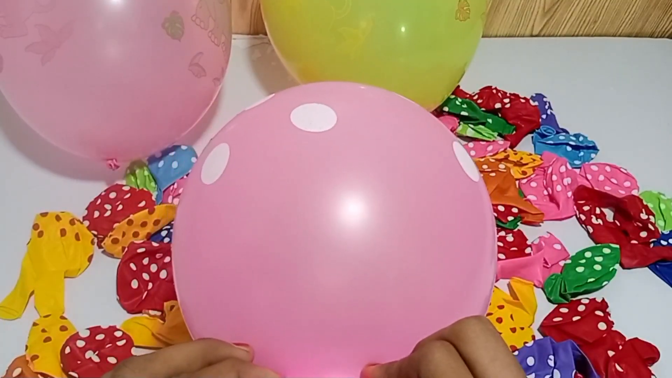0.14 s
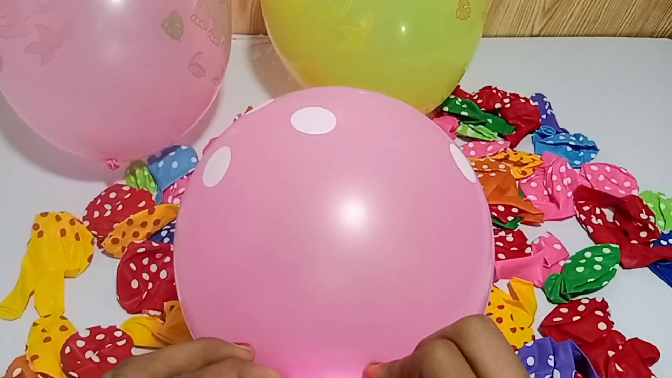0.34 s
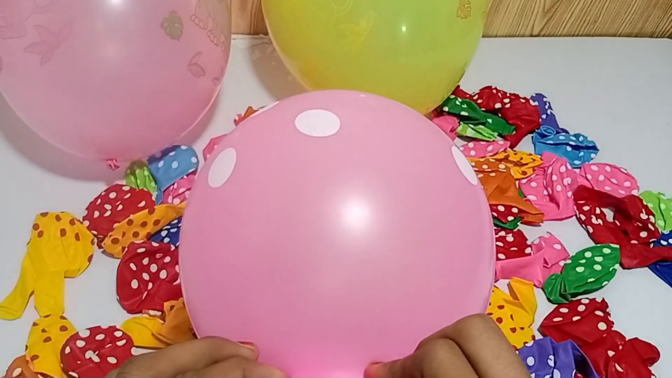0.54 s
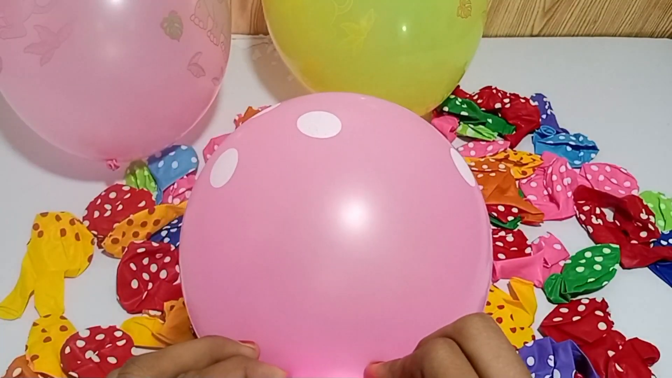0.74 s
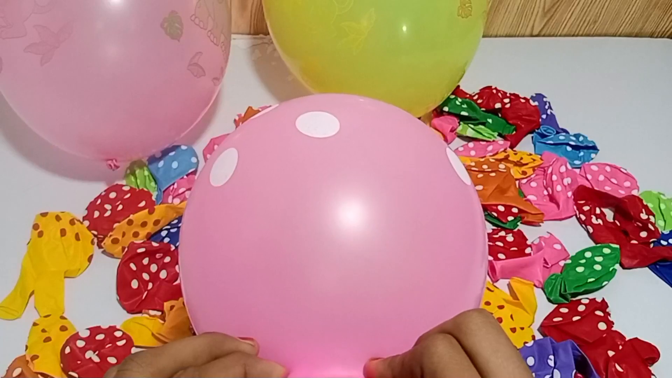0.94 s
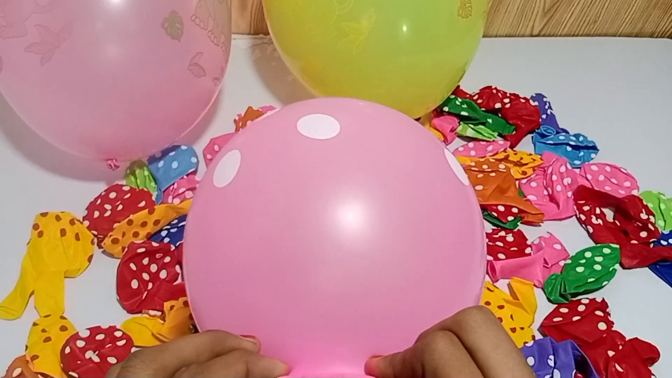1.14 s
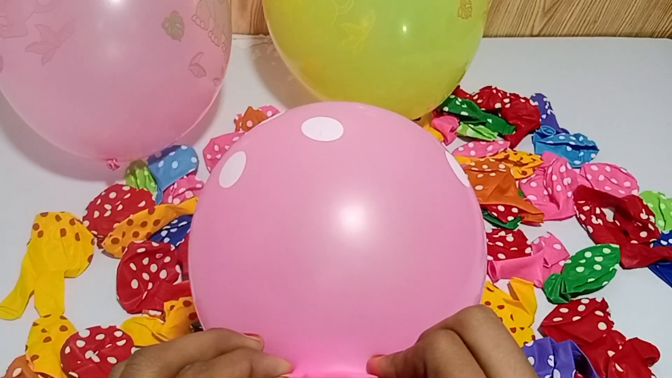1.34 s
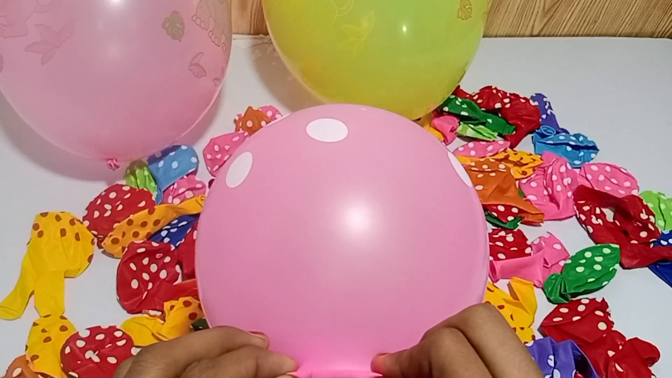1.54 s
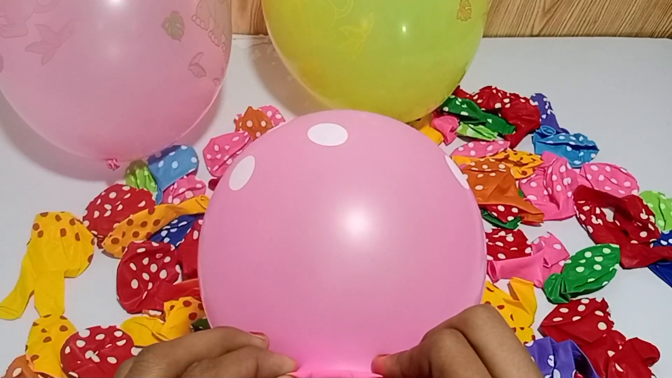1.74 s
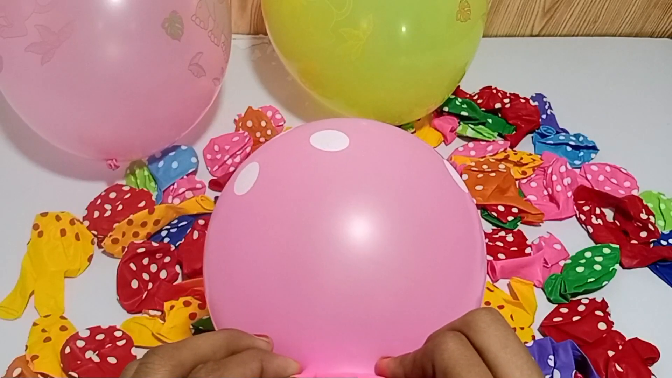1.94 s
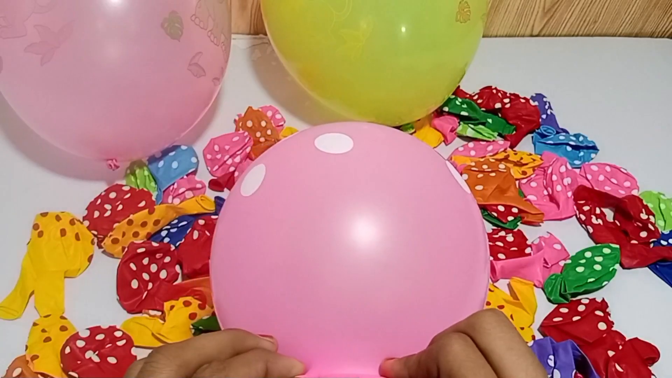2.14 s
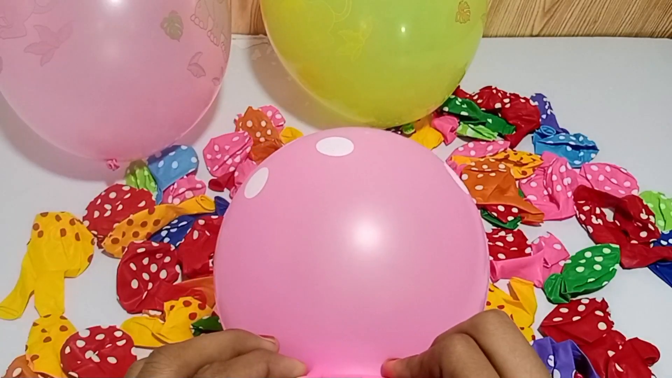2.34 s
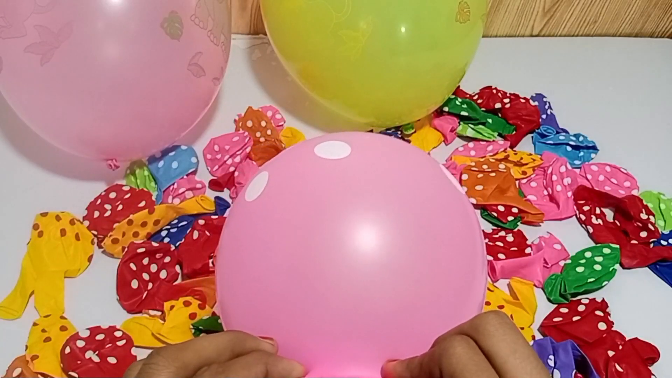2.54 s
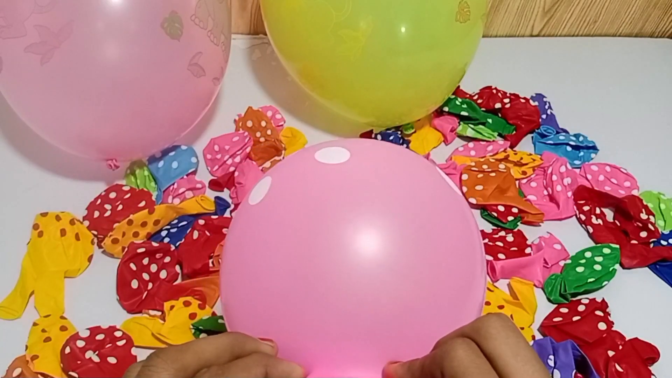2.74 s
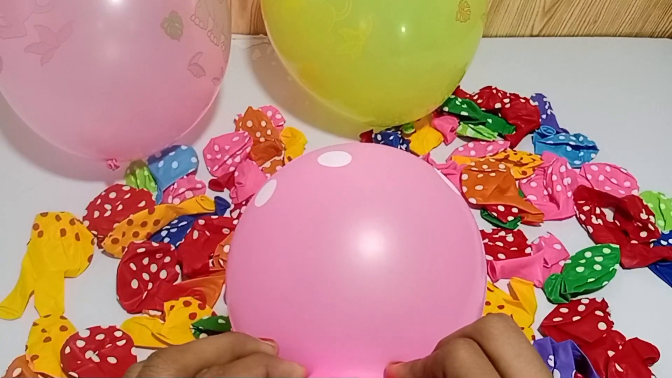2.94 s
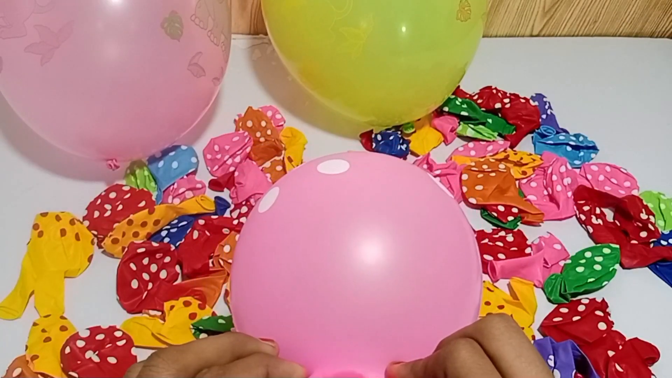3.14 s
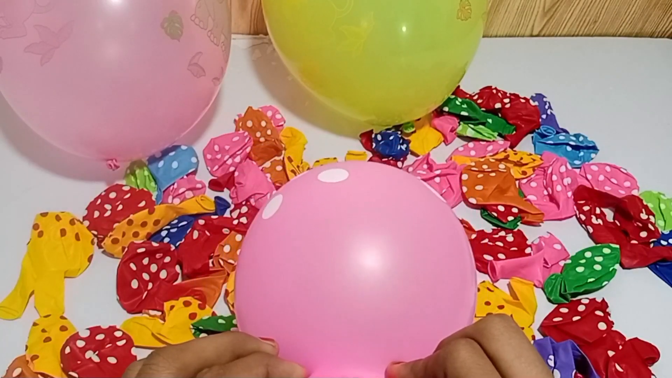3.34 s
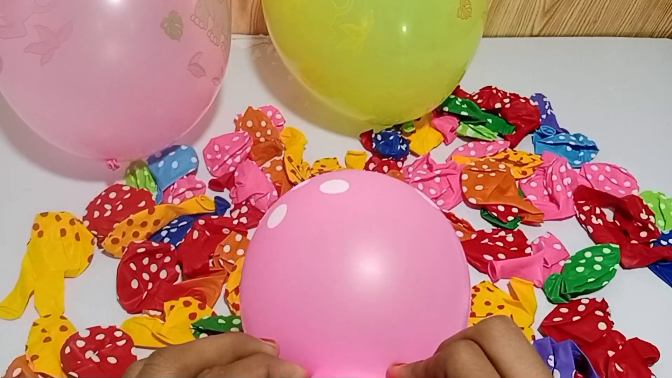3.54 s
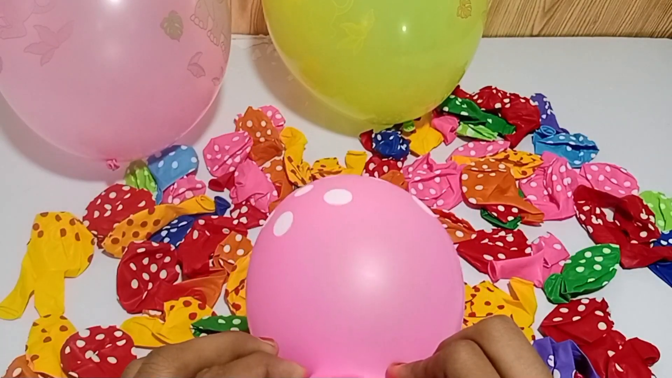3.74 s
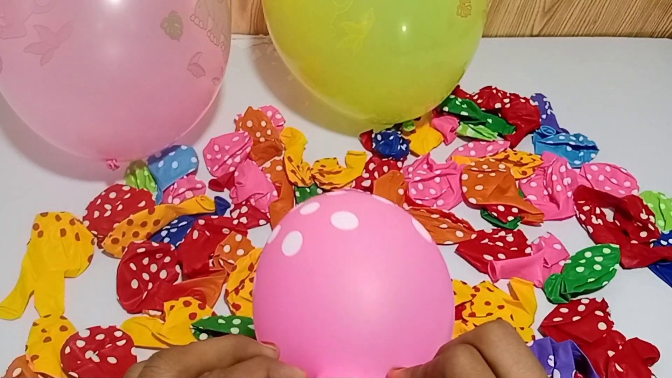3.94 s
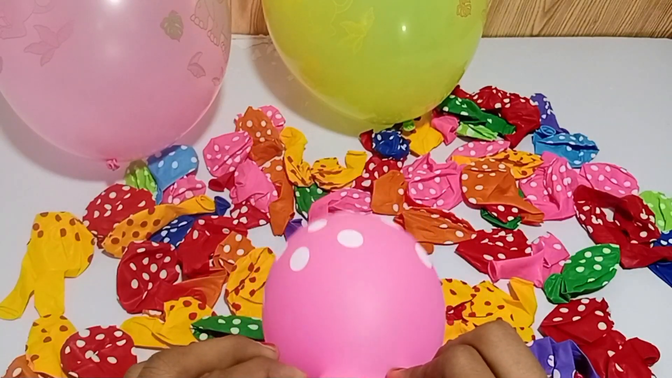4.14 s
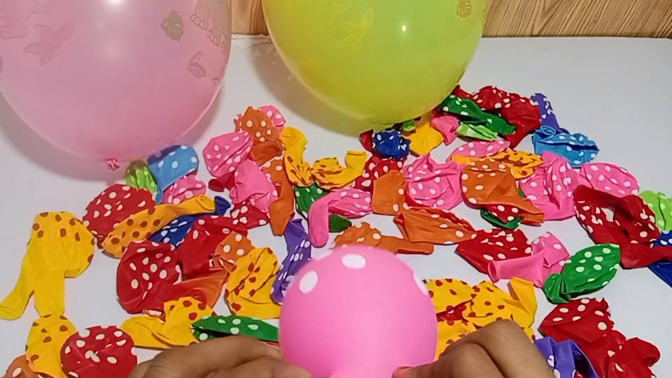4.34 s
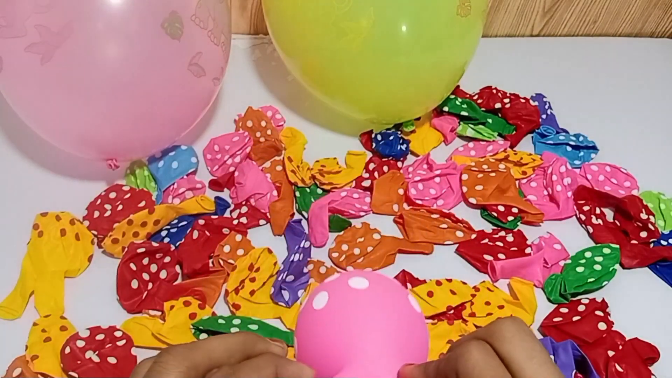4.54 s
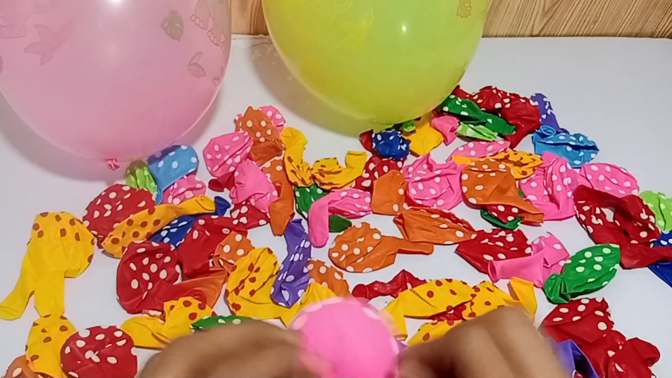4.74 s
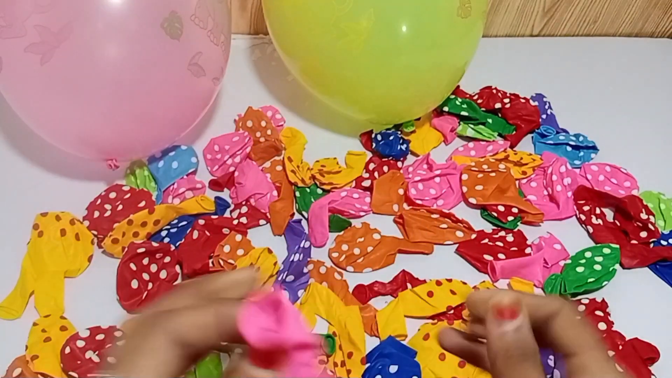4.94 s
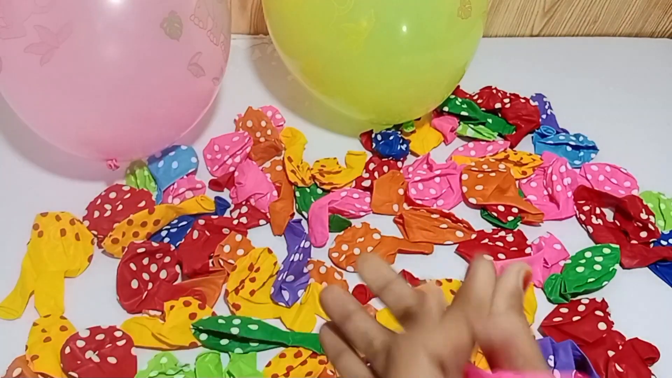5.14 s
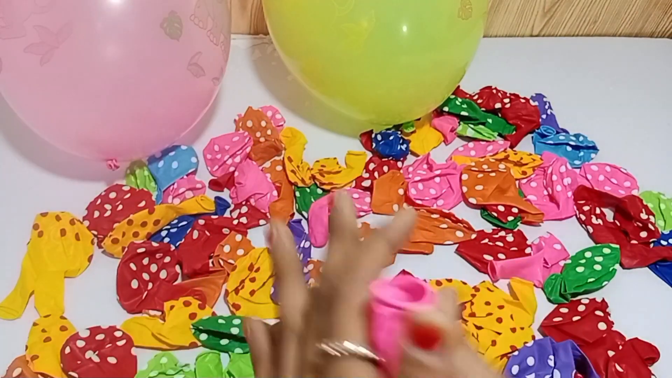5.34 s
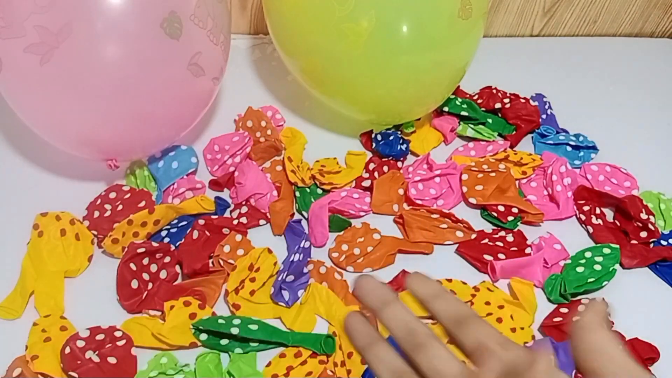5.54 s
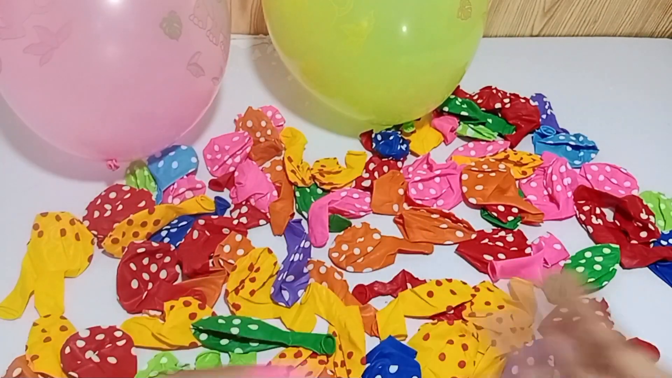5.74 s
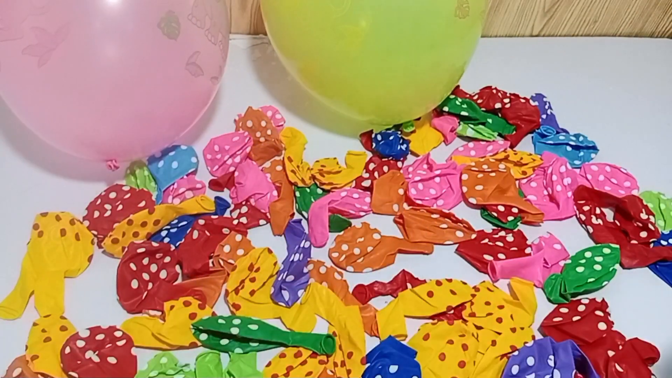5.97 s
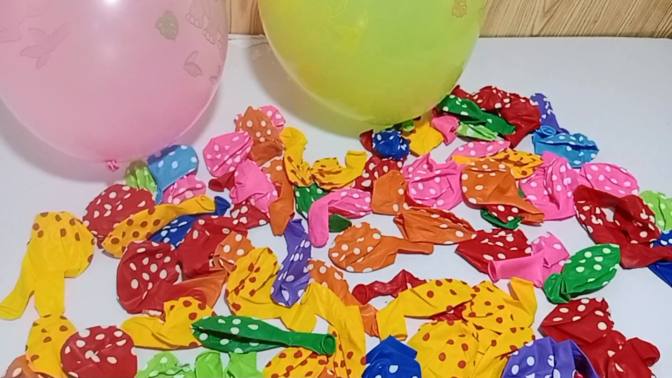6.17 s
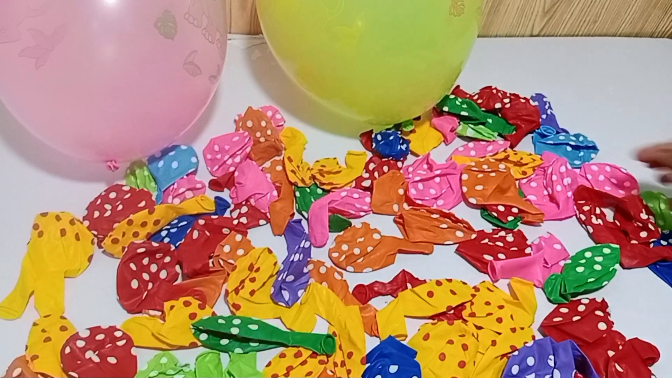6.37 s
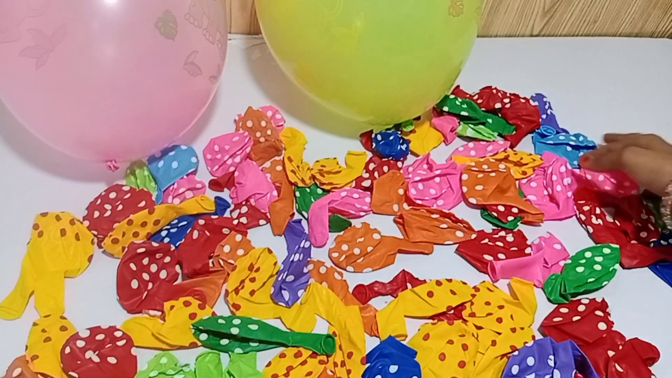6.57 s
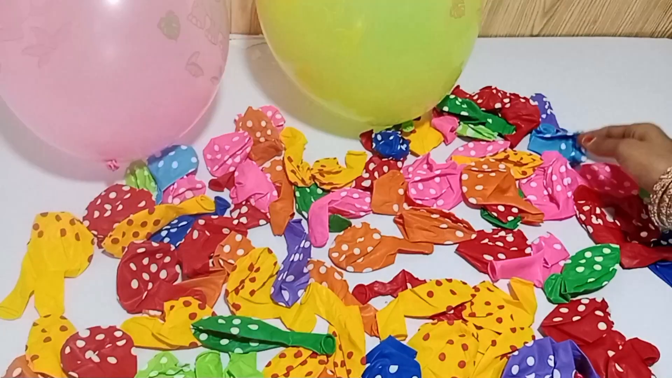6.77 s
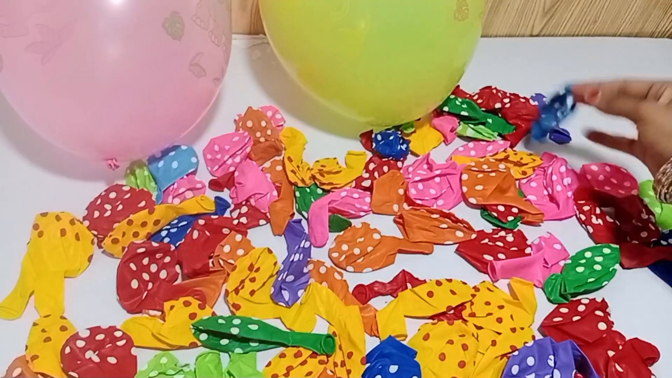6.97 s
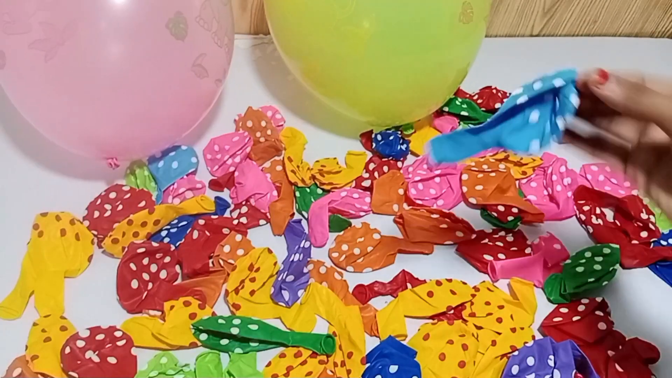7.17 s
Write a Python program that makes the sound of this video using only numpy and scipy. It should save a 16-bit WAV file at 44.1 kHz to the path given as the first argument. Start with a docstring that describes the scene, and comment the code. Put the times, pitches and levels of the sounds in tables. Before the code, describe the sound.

Close up in a reverberant hard-walled room, air escapes through a balloon's pinched neck as a long, rough, buzzing squeal, wavering but steady in pitch for over four seconds. Near the end it gushes and climbs to a piercing shriek over a sagging whistle, then cuts off with a puff. Soft table thuds, rubber snaps and a few bright bangle jingles follow over faint hiss.

```python
"""Balloon squealing empty

A balloon empties through its stretched neck, heard close up in a hard-walled room.
The rubber lips flap roughly and chop the air into a rasping squeal that rings the neck.
As the balloon runs out, tight vibrations of the shrinking neck rise to a shriek over a sagging whistle.
Filtered noise makes the rushing air, table bumps, rubber snaps and a faint steady hiss that is switched
between two levels; fading sine waves make jingling bangles."""
import sys
import numpy as np
from scipy import signal
from scipy.fft import irfft, next_fast_len
from scipy.io import wavfile
from scipy.ndimage import uniform_filter1d

SR = 44100
rng = np.random.default_rng(int(sys.argv[2]) if len(sys.argv) > 2 else 0)


def transcribe(u):
    """Save the signal u as a 16-bit wav file named by the first command-line argument.

    u: samples, shape (n,) or (channels, n), limited to [-1, 1]; the rate is SR.
    q: integer samples, one column per channel.
    """
    v = np.clip(np.atleast_2d(u).T, -1, 1)
    q = np.round(v * 32767).astype(np.int16)
    wavfile.write(sys.argv[1], SR, q)


N = 317916
TIME = np.arange(N) / SR

# middle pitch of the flapping lips: (time [s], pitch [Hz])
LIP_PITCH = [(0, 538.2), (.45, 528), (.9, 533.9), (2.0, 532.4), (2.8, 525.8), (3.2, 518), (3.6, 521),
             (4.1, 524.6)]
# colour of the slapping lips: (frequency [Hz], relative level [dB per Hz])
RASP_COLOUR = [(60, -29), (230, -18.5), (390, -13.5), (580, -5), (700, -16.5), (800, -4), (1000, -2.3),
               (1270, 1), (1800, -.5), (2400, -.5), (2800, -6), (3400, -1.5), (4500, -6.5), (7500, -25.5)]
# colour of the air between the lips: (frequency [Hz], relative level [dB per Hz])
HISS_COLOUR = [(100, -49), (2000, -49), (5000, -15.5), (6200, -3.5), (7150, -11.5), (7800, -1.5),
               (8500, -6), (9200, 0.5), (10100, 3), (11000, -7), (12200, -18), (13200, -20.5),
               (14200, -14.5), (15300, -9)]
# surges of the lips' own tone, building up and collapsing: (start [s], collapse [s], top level [dB])
TONE_SURGES = [(-.1, .02, -36), (.04, .13, -36.5), (.15, .39, -32.5), (.25, .53, -37), (.42, .705, -32.5),
               (.68, 1.09, -41), (1.12, 1.46, -41), (1.6, 1.98, -44.5), (2.12, 2.285, -40),
               (2.32, 2.58, -41.5), (2.87, 3.03, -33), (3.05, 3.14, -40.5), (3.21, 3.31, -41),
               (3.36, 3.58, -43.5), (3.85, 4.46, -38.5)]
# surges of its octave, which carries the squeal: (start [s], collapse [s], top level [dB])
OCTAVE_SURGES = [(-.5, .13, -25.5), (.36, .48, -35), (.6, .73, -37), (.92, 1.03, -31.5), (1.12, 1.35, -36),
                 (1.8, 1.97, -33.5), (2.3, 2.85, -35.5), (2.95, 3.2, -32.5), (3.36, 3.65, -36),
                 (4.08, 4.3, -33.5)]
# resonances of the stretched neck: (frequency [Hz], width [Hz], level against the rasp [dB])
NECK_RESONANCES = [(577.4, 20, -27), (995, 42, -12.5), (1245, 28, -17), (1552, 41, -13), (1610, 30, -11),
                   (2108, 70, -5), (2390, 50, -17), (2660, 48, -23), (3026, 180, -9), (3290, 170, -11.5),
                   (4195, 110, -13.5), (5860, 84, -14.5), (6270, 100, -10), (6880, 68, -18)]
# as the rubber slackens, some resonances give way to others: (frequency [Hz], change [dB])
SLACK_CHANGE = [(1250, 1.5), (1580, 4.5), (2100, -11), (2640, 4), (3100, -1), (4100, 1.5)]
# brief tones: neck whistles, the octave slipping flat near 1000 Hz and one beat tone near 584 Hz:
# (time [s], frequency [Hz], level before throbbing [dB])
BRIEF_TONES = [(.06, 2110, -31.5), (.14, 1612, -32), (.42, 3047, -37), (.45, 985, -34), (.49, 2110, -39),
               (.701, 3040, -37), (.82, 2118, -37), (1.01, 995, -35), (1.05, 3241, -39), (1.061, 1612, -36),
               (1.27, 1000, -33), (1.361, 3335, -38), (1.39, 4180, -36), (1.44, 2110, -32.5),
               (1.46, 3060, -39.5), (1.47, 985, -35), (1.589, 4170, -38), (2.29, 1000, -35),
               (2.54, 1000, -32), (2.73, 2110, -35.5), (2.84, 1238, -39), (2.96, 3036, -38),
               (3.1, 1008, -30.5), (3.16, 6234, -37), (3.19, 1005, -29.5), (3.34, 2390, -39.5),
               (3.46, 2390, -39.5), (3.59, 1008, -33), (3.84, 2659, -37.5), (4.02, 6245, -35.5),
               (4.04, 583.5, -37.5), (4.16, 4170, -33), (4.26, 5954, -34), (4.35, 1561, -31),
               (4.35, 3122, -28), (4.41, 6810, -38), (4.45, 1566, -31)]
# gushes of air: (start [s], loudest [s], level [dB], fade [s])
GUSHES = [(4.1, 4.56, -36.5, .27), (4.769, 4.832, -36.5, .025), (5.129, 5.147, -51.5, .025)]
# hollow rush of air through the slack neck: (frequency [Hz], relative level [dB per Hz])
HOLLOW_COLOUR = [(100, -40), (250, -26), (500, -6.5), (740, -20), (1100, -1), (1750, -1), (2600, -19.5),
                 (6000, -34), (15000, -45)]
# tight vibrations of the shrinking neck: (first pitch [Hz], last pitch [Hz], bend of the glide [power],
# strand spacing [Hz], swell start [s], collapse start [s], collapse length [s], top level [dB],
# ease of the growth [power])
SHRIEK_VOICES = [(3040, 3520, 3.1, 100, 4.065, 4.58, .15, -26.6, 3.3),
                 (4180, 5080, 1.6, 135, 4.02, 4.615, 0.11, -28.5, 1.6),
                 (6080, 6750, 5.5, 170, 4.26, 4.57, .07, -25.7, 1.7)]
# hands and balloon bump the table: (time [s], peak level [dB], pitch [Hz], width [Hz], length [s])
BUMPS = [(3.164, -47.5, 148.9, 130, 0.011), (3.296, -37, 404, 100, 0.013), (3.772, -46, 157.9, 130, 0.0095),
         (4.12, -40, 220, 200, 0.035), (4.182, -34.5, 210, 198, 0.019), (4.248, -40, 210, 200, 0.0093),
         (4.445, -39.5, 190, 160.3, 0.022), (4.544, -37, 200, 200, 0.0081), (4.658, -44.5, 342, 70, 0.022),
         (4.842, -39, 205, 220, 0.016), (5.143, -36, 200, 230, 0.011), (6.003, -52.5, 152, 34, 0.02)]
# bangles knock together; glancing knocks ring mostly the top modes: (time [s], level [dB], brightness [dB])
JINGLES = [(4.94, -62, 12), (4.971, -56, 12), (5.147, -47, 3), (5.171, -42, 3), (5.185, -48, -9),
           (5.228, -40.5, 4), (5.497, -47, -7), (5.513, -46.5, -4), (5.526, -45, 4), (6.245, -55, 5),
           (6.252, -45.5, 2), (6.269, -42, 0), (6.296, -49, 2), (6.339, -48, -5), (6.431, -47.5, 2),
           (6.457, -55, 0), (6.544, -54.5, -1), (6.569, -58, 0), (6.626, -51.5, 7)]
# ring of the bangles: (frequency [Hz], relative level [dB], time to fade by 60 dB [s])
BANGLE_MODES = [(450, -26, .3), (1450, -22, 0.3), (4020, -20, 0.18), (4425, -9.5, 0.16), (7730, 0.5, 0.18),
                (7840, -1, 0.2), (8260, 2.5, 0.22), (8450, -0.5, 0.22), (12310, 0.5, 0.16),
                (12450, -2, .16), (12670, -1, .2), (13300, -1, .18), (13420, 0, 0.16), (13590, -1, .18)]
# the limp rubber snaps: (time [s], level before colouring [dB])
SNAPS = [(5.387, -49), (5.399, -38.5), (5.927, -49), (5.951, -46)]
# hands slide over rubber: (start [s], end of growth [s], level [dB])
STROKES = [(4.75, 4.85, -45), (5.083, 5.15, -54), (5.194, 5.3, -66), (5.349, 5.678, -63.5)]
# colour of the handled rubber: (frequency [Hz], relative level [dB per Hz])
RUBBER_COLOUR = [(200, -17), (1500, -9), (3000, -6), (10000, 4.5), (15500, -8)]
# spans in which the steady hiss is switched up: (start [s], end [s])
STEADY_HISS_SPANS = [(0, 5.1), (5.768, 5.97), (6.215, 6.248), (6.826, 7.3)]
# colour of the steady hiss: (frequency [Hz], relative level [dB per Hz])
STEADY_HISS_COLOUR = [(40, -15.5), (100, -9), (300, -10.5), (500, -5.5), (900, -12), (6000, -19),
                      (8500, -27), (10000, -15), (15500, -28.5)]
# how long the room rings: (frequency [Hz], time to fade by 60 dB [s])
ROOM_FADE = [(200, 0.5), (1300, 1.14), (4000, 0.91), (15000, .5)]
# how loud the room answers: (frequency [Hz], level against the direct sound [dB])
ROOM_LEVEL = [(500, -9.5), (1200, -5.5), (4000, -7), (15000, -8)]

# the lips stop flapping, then the balloon is empty (s)
STALL_S, EMPTY_S = 4.5, 4.83
FLUTTER_HZ = 78.44  # middle pitch of the neck's slower flutter


def lips(drift=.0075, jitter=.02, sway=.012, flutter_spread_hz=6):
    """Cycles done by the lips, and the phase of the slower flutter of the neck that sways them."""
    flap = waver(FLUTTER_HZ, flutter_spread_hz, 12)
    pitch_change = drift * wander(14) + jitter * wander(200) + sway * np.cos(flap)
    hz = curves(LIP_PITCH)[0] * (1 + pitch_change)
    return np.cumsum(hz) / SR, flap


def squeal(turns, flap, stall_length=.06, throb_db=2.0):
    """The lips' own tone, its octave throbbing with the flutter, and lower tones that beat against it."""
    phase = 2 * np.pi * turns
    low_db = surging(TONE_SURGES, rest_db=-50.5, ease=1.9, collapse=.025)
    octave_db = surging(OCTAVE_SURGES, rest_db=-41.5, ease=2.4, collapse=.051)
    low = amp(low_db) * unit(np.cos(phase) * amp(1.7 * wander(14)))

    # the octave throbs less when it sings strongly: from -32.5 dB, over 6 dB, it loses 55 % of the throb
    loose = 1 - .55 * np.clip((octave_db + 32.5) / 6, 0, 1)
    throb = amp(loose * (throb_db * np.cos(flap) + 1.6 * wander(30)))
    tremble = waver(0, 11 * loose, 22) + .42 * loose * wander(45)
    octave_wave = np.cos(2 * phase + tremble) + .22 * loose * np.cos(2 * phase - flap)
    octave = amp(octave_db) * unit(octave_wave * throb)

    # at full pressure the flutter splits lower tones off the fundamental
    beats = np.cos(phase - flap) + amp(-16) * np.cos(phase - 2 * flap)
    beat_db = low_db - 7 - 10 * ramp(.59, .08)
    beat = amp(beat_db) * unit(beats)
    return (low + octave + beat) * (1 - ramp(STALL_S, stall_length))


def jet(turns, flutter, uneven_db=3.5, stray_per_s=650, puff_turns=.23):
    """Each closing of the lips is a slap of chance size with a puff of air; stray slaps fall in between."""
    closing = np.diff(np.floor(turns + .09 * wander(400)), prepend=0) > 0
    stray = rng.random(N) < stray_per_s / SR
    slap_db = uneven_db * 2 * np.tanh(rng.standard_normal(N) / 2)
    slaps = (closing + .82 * stray) * amp(slap_db)
    puffs = (.18 + np.exp(-(turns % 1) / puff_turns)) * rng.standard_normal(N)
    throb = amp(1.7 * flutter + 1.5 * wander(76))
    drive = unit(unit(slaps - slaps.mean()) + .66 * unit(puffs)) * throb
    rasp_flow = flow(first_db=-41.5, db_per_s=.8, stall_db=7.5, stall_length=.26)
    hiss_flow = flow(first_db=-38, db_per_s=1.62, stall_db=7, stall_length=.36)
    rasp = rasp_flow * (unit(colour(drive, RASP_COLOUR)) + neck(drive))
    return rasp + hiss_flow * unit(colour(drive, HISS_COLOUR))


def flow(first_db, db_per_s, stall_db, stall_length, puff_s=.0042, puff_db=6.5, die_db_per_s=351):
    """Strength of the jet: it climbs as the neck relaxes, drops at the stall, puffs once more and dies."""
    climb = first_db + db_per_s * np.minimum(TIME, STALL_S) - stall_db * ramp(STALL_S, stall_length)
    last_puff = puff_db * np.exp(-((TIME - EMPTY_S + puff_s) / puff_s) ** 2)
    return amp(climb + last_puff - die_db_per_s * np.maximum(TIME - EMPTY_S, 0))


def neck(drive, slip=.006, swell_db=3.0, settle_db=2, limp_db=10):
    """Resonances that shift together with the grip of the fingers and swell one by one."""
    stretch = 1 + slip * wander(6.9)
    # the taut neck of the full balloon rings most, the limp one hardly at all
    settling = settle_db * np.interp(TIME, [0, 4], [1, -1])
    taut = amp(settling - limp_db * ramp(STALL_S, EMPTY_S - STALL_S))
    slack = ramp(2.7, .63)
    ringing = 0
    for hz, width, db in NECK_RESONANCES:
        level = amp(db + slack * read(SLACK_CHANGE, hz) + swell_db * wander(8) - 1)
        ringing = ringing + level * ring(drive, hz * stretch, width)
    return taut * ringing


def brief_tones(flutter, length=.031):
    """Brief throbbing tones: neck whistles, the octave slipping flat near 1000 Hz, one beat near 584 Hz."""
    out, shake = np.zeros(N), waver(0, 20, 70)
    for s, hz, db in BRIEF_TONES:
        near = abs(TIME - s) < 3 * length
        t = TIME[near] - s
        swell = amp(db) * np.exp(-.5 * (t / length) ** 2)
        out[near] += swell * np.cos(2 * np.pi * hz * t + shake[near])
    return out * amp(2.3 * flutter)


def gushes(ease=1.4, range_db=14):
    """Air rushes through the slackening neck, leaves in a last huff, and a hand squeezes the limp rubber."""
    level = sum(burst(start, end, db, ease, fade, range_db) for start, end, db, fade in GUSHES)
    return level * unit(colour(rng.standard_normal(N), HOLLOW_COLOUR))


def shriek(begin=4.0, fade=.036, stutter_depth=.6, stutter_hz=64):
    """Three fast vibrations glide up as the balloon shrinks and a low whistle sags, all throbbing together."""
    shrunk, tone = ramp(begin, EMPTY_S - begin - fade), 0
    for first_hz, last_hz, bend, spacing_hz, start, end, collapse, top_db, ease in SHRIEK_VOICES:
        hz = first_hz + (last_hz - first_hz) * shrunk ** bend
        level_db = surging([(start, end, top_db)], -46.5, ease, collapse)
        tone = tone + amp(level_db) * strands(hz, spacing_hz)
    sounding = ramp(begin - fade, fade) - ramp(EMPTY_S - fade, fade)

    # the lower whistle sags by 250 Hz per second as the neck slackens
    loudest = 4.585
    whistle_hz = 1320 - 250 * (TIME - loudest)
    whistle_gain = burst(4.52, loudest, db=-29, ease=1, release=.29, range_db=22)
    whistle = whistle_gain * strands(whistle_hz, 55)
    stutter = unit(1 - stutter_depth * np.cos(waver(stutter_hz, 12, 20) / 2) ** 6)
    return stutter * (tone * sounding + whistle)


def strands(hz, spacing_hz, tremble_hz=64, side_db=-4, uneven_db=1.8):
    """Three neighbouring strips of rubber vibrate at slightly different pitches."""
    total = 0
    for k in (-1, 0, 1):
        level = amp(abs(k) * side_db + uneven_db * wander(35))
        total = total + level * np.cos(waver(hz + k * spacing_hz, tremble_hz, 70))
    return unit(total)


def bumps():
    """Soft blows on the table top: short dull thuds made of noise in a narrow band."""
    out, t = np.zeros(N), np.arange(SR // 4) / SR
    for s, db, hz, width, length in BUMPS:
        edges = [max(hz - width / 2, 20), hz + width / 2]
        band = signal.butter(2, edges, "bandpass", fs=SR, output="sos")
        thud = signal.sosfilt(band, rng.standard_normal(len(t)) * t * np.exp(-2 * t / length))
        add(out, s, amp(db) * thud / abs(thud).max())
    return out


def bangles(rebound=.43, chatter_s=.022, mismatch=.005, scrape=.27, scrape_s=.025, count=5):
    """Every knock sets off a short scrape and smaller rebounds among hoops of nearly the same size."""
    out, t = np.zeros(N), np.arange(SR // 2) / SR
    hz, mode_db, t60 = np.transpose(BANGLE_MODES)[:, :, None]
    tilt = np.interp(hz, [4500, 8000, 12000], [-1, 0, 1])  # a bright knock favours the top modes
    for s, db, bright_db in JINGLES:
        delays = [0, *np.sort(rng.random(count - 1)) * chatter_s]
        for k, delay in enumerate(delays):
            strike, phase, detune = rng.standard_normal((3, len(BANGLE_MODES), 1))
            level = amp(mode_db + 3.8 * strike + bright_db * tilt - 60 * t / t60)
            hoop_hz = hz * (1 + mismatch * detune)
            hoops = (level * np.sin(2 * np.pi * (hoop_hz * t + phase))).sum(0)
            sharp_noise = np.diff(rng.standard_normal(len(t) + 2), 2)
            tick = sharp_noise * (.95 * np.exp(-t / .003) + scrape * np.exp(-t / scrape_s))
            add(out, s + delay, rebound ** k * amp(db - 13) * (hoops + tick))
    return out


def rubber(decay_s=.0015):
    """Snaps and rustle of the empty balloon in the hands: fading clicks and grainy noise."""
    snaps, t = np.zeros(N), np.arange(SR // 20) / SR
    for s, db in SNAPS:
        add(snaps, s, amp(db) * rng.standard_normal(len(t)) * np.exp(-t / decay_s))
    grain = rng.standard_normal(N) * amp(3.9 * wander(130))
    sliding = sum(burst(*row, ease=8.1, release=.23, range_db=28) for row in STROKES)
    return colour(snaps, RUBBER_COLOUR) + sliding * unit(colour(grain, RUBBER_COLOUR))


def room(x):
    """Hard walls return a diffuse tail of noise, each band dying at its own speed."""
    hz, t, z = signal.stft(rng.standard_normal(SR), SR, nperseg=256)
    t60 = read(ROOM_FADE, hz)[:, None]
    # a slowly dying band starts lower, so that its whole tail keeps the level in the table
    height = amp(read(ROOM_LEVEL, hz))[:, None] * np.sqrt(2 * np.log(1000) / (t60 * SR))
    fading = height * amp(-60 * t / t60) * (t > .004)
    tail = signal.istft(z * fading, SR, nperseg=256)[1]
    return signal.fftconvolve(x, tail)[:N]


def suppress(x, threshold_db=-59, depth_db=7, top_hz=6000, size=2000):
    """A gentle gate: below the treble, a sound that falls under the threshold is turned further down."""
    low = signal.sosfiltfilt(signal.butter(2, top_hz, fs=SR, output="sos"), x)
    level_db = 10 * np.log10(abs(uniform_filter1d(low ** 2, size)) + 1e-14)
    return x - low + low * amp(-np.clip(threshold_db - level_db, 0, depth_db))


def steady_hiss(low_db=-79, high_db=-66.5, rise_s=.0062, fall_s=.012):
    """Faint steady hiss, switched between a low and a higher level at set times."""
    switched_up = sum(ramp(start, rise_s) - ramp(end, fall_s) for start, end in STEADY_HISS_SPANS)
    level = amp(low_db + (high_db - low_db) * switched_up)
    return level * unit(colour(rng.standard_normal(N), STEADY_HISS_COLOUR))


def amp(db):
    """Turns decibels into a gain."""
    return 10 ** (np.asarray(db) / 20)


def unit(x):
    """Scales a sound to an rms (average strength) of one."""
    return x / np.sqrt(np.mean(x ** 2) + 1e-20)


def read(points, hz):
    """Reads a spectrum table on a log-frequency axis."""
    f, value = np.transpose(points)
    return np.interp(np.log(hz + 1), np.log(f + 1), value)


def curves(rows):
    """Each column of a time table at every sample."""
    s, *columns = np.transpose(rows)
    return [np.interp(TIME, s, c) for c in columns]


def add(mix, s, sound):
    """Mixes a sound in at s seconds."""
    part = mix[round(s * SR):][:len(sound)]
    part += sound[:len(part)]


def wander(width_hz):
    """Random motion of unit size; a greater width makes it quicker."""
    size = next_fast_len(N, True)
    hz = np.arange(0, 2500, SR / size)
    real, imag = rng.standard_normal((2, len(hz)))
    bell = np.exp(-.5 * (hz / width_hz) ** 2)
    return unit(irfft((real + 1j * imag) * bell, size)[:N])


def waver(hz, spread_hz, speed_hz):
    """Phase of a vibration whose pitch trembles at random."""
    return 2 * np.pi * np.cumsum(hz + spread_hz * wander(speed_hz)) / SR


def colour(x, points, size=2048):
    """Filters with the given spectrum, only ever after the event, so that clicks stay sharp."""
    log_gain = np.log(amp(read(points, abs(np.fft.fftfreq(size, 1 / SR)))))
    taps = np.fft.ifft(np.exp(np.conj(signal.hilbert(log_gain)))).real
    return signal.oaconvolve(x, taps)[:N]


def ring(x, hz, width):
    """A resonance with steep skirts that follows the curve hz."""
    turn, r = np.exp(2j * np.pi * np.cumsum(hz) / SR), np.exp(-np.pi * width / SR)
    # shift the resonance down to 0 Hz, smooth twice there and shift back
    smooth = signal.lfilter([1], [1, -2 * r, r * r], x / turn)
    return unit((turn * smooth).real)


def ramp(start, length):
    """Rises evenly from 0 to 1."""
    return np.clip((TIME - start) / length, 0, 1)


def surge(start, end, ease, collapse):
    """Grows from 0 to 1, levelling off the sooner the greater the ease, and collapses after the end."""
    growth = 1 - (1 - ramp(start, end - start)) ** ease
    return growth * (1 - ramp(end, collapse))


def surging(rows, rest_db, ease, collapse):
    """Level in dB of a vibration that rests between its surges."""
    rises = [(db - rest_db) * surge(start, end, ease, collapse) for start, end, db in rows]
    return rest_db + np.max(rises, axis=0)


def burst(start, end, db, ease, release, range_db):
    """Gain of one surge out of silence and back."""
    return amp(db - range_db) * (amp(range_db * surge(start, end, ease, release)) - 1)


def scene(shriek_to_room=.6):
    """The balloon and the hands, heard directly and through the room; the shriek comes more directly."""
    turns, flap = lips()
    flutter = unit(np.cos(flap))
    balloon = squeal(turns, flap) + jet(turns, flutter) + brief_tones(flutter) + gushes()
    ending = shriek()
    near = balloon + bumps() + bangles() + rubber()
    echoes = suppress(room(near + shriek_to_room * ending))
    return (near + ending + echoes + steady_hiss())[None]


def record(dry):
    """Band limit: a steep filter takes away what lies above 15.7 kHz."""
    taps = signal.firwin(511, 15700, window=("kaiser", 9), fs=SR)
    return signal.oaconvolve(dry, taps[None], "same")


dry = scene()
out = record(dry)
transcribe(out)
```